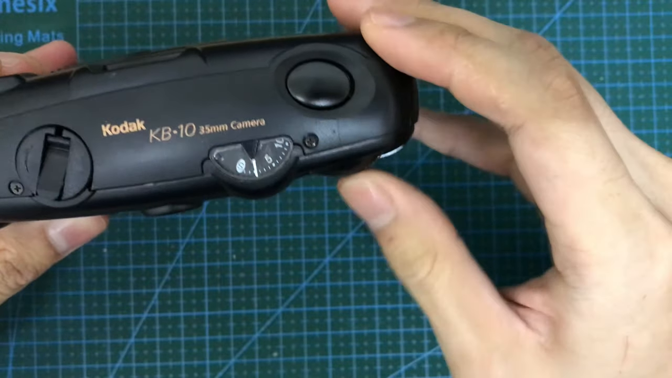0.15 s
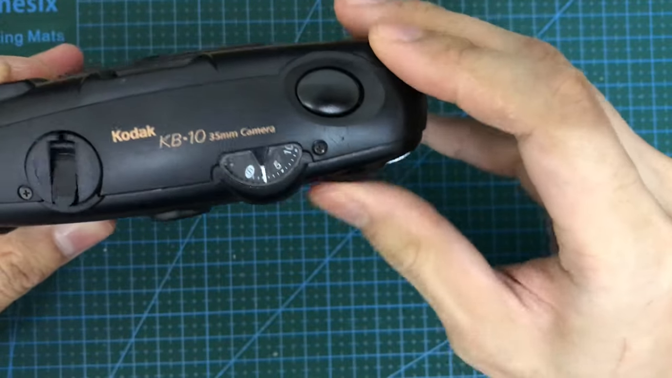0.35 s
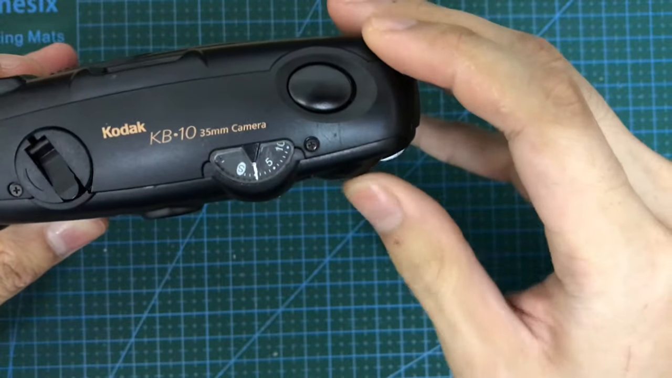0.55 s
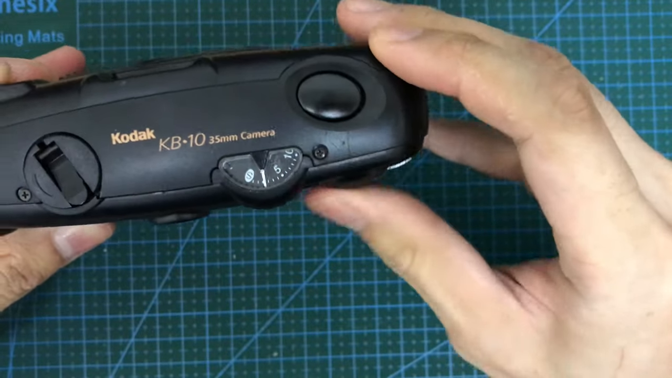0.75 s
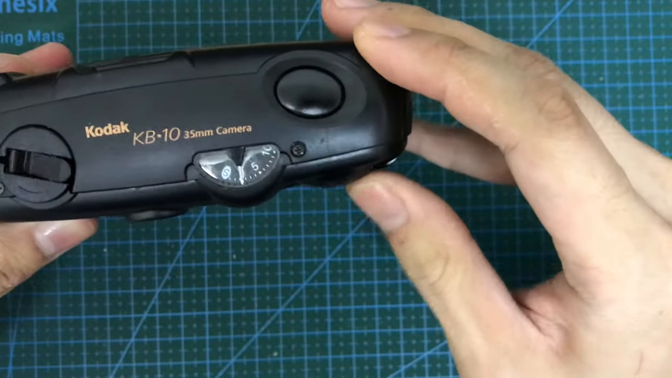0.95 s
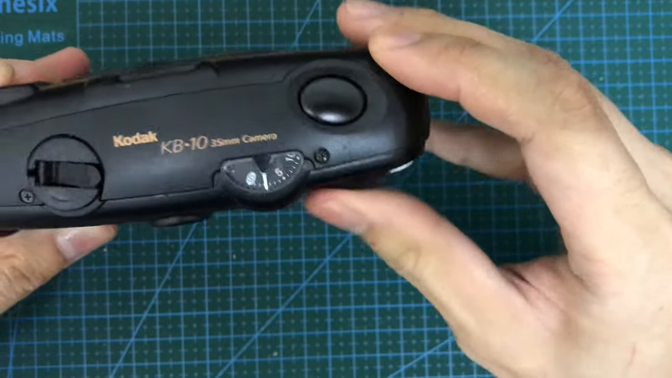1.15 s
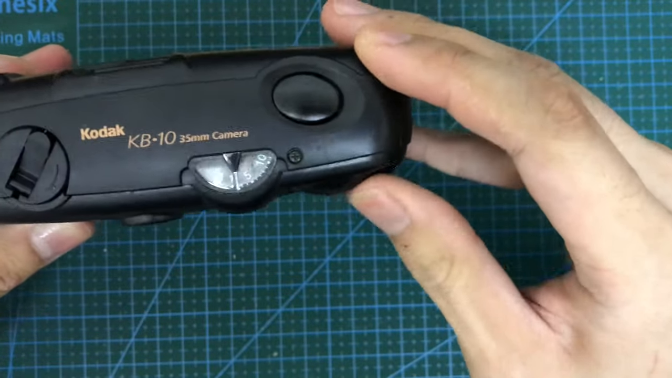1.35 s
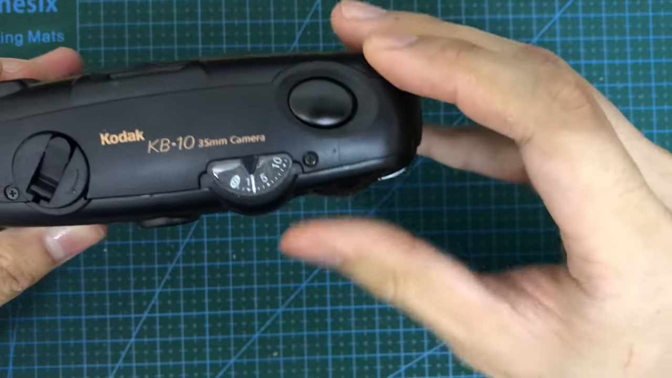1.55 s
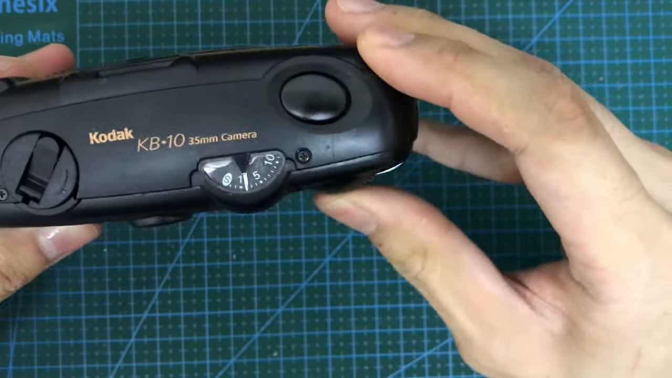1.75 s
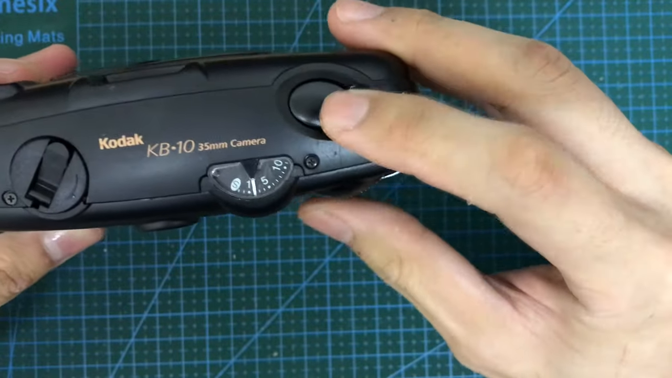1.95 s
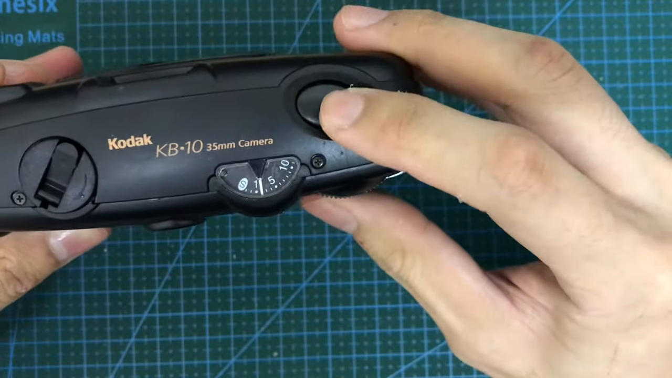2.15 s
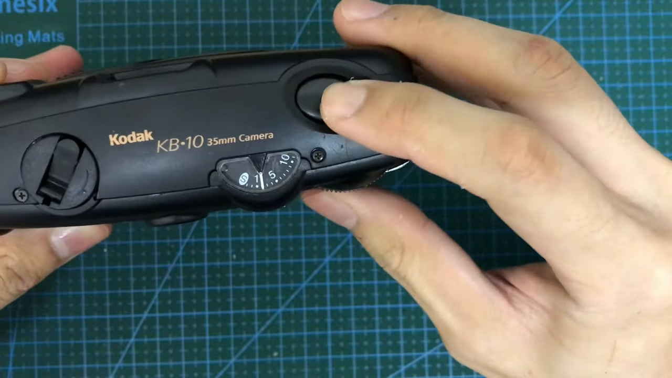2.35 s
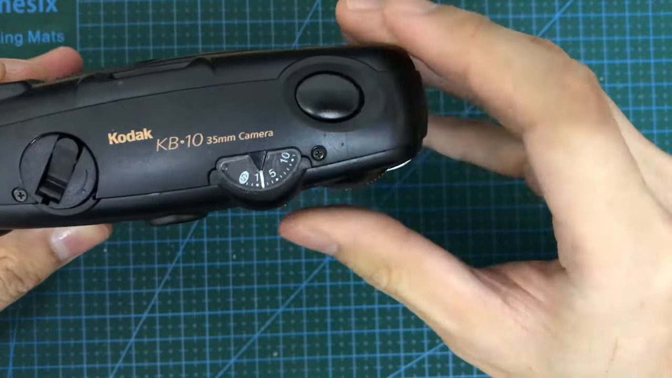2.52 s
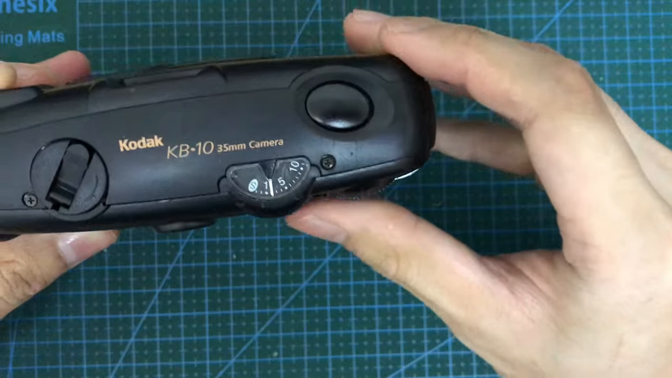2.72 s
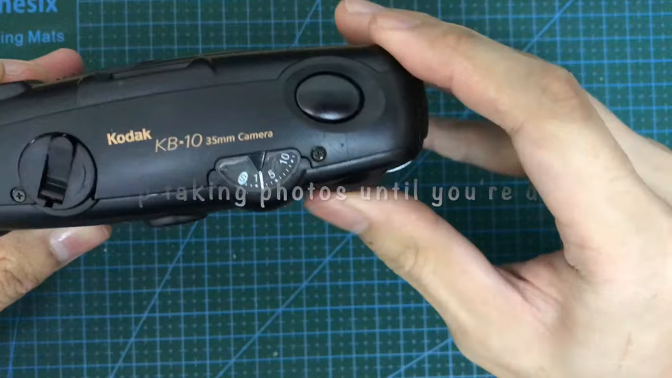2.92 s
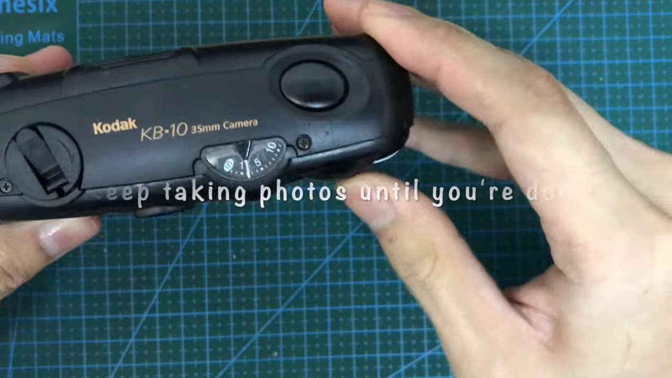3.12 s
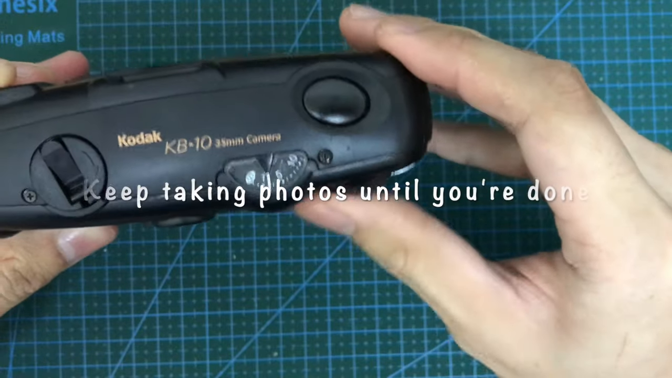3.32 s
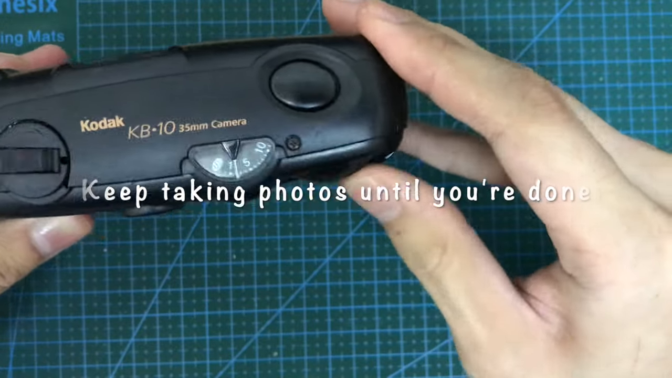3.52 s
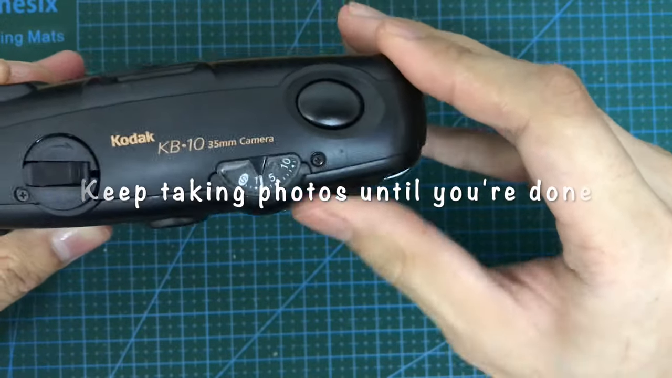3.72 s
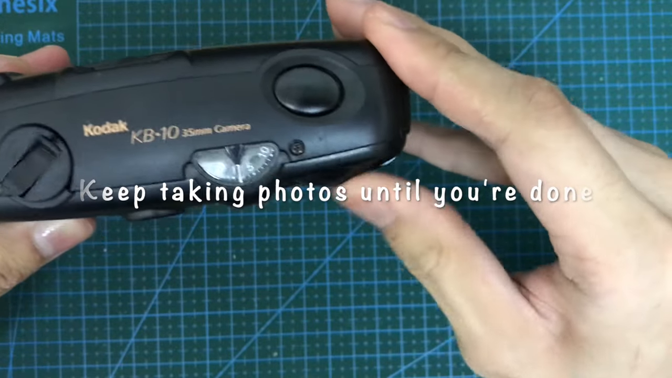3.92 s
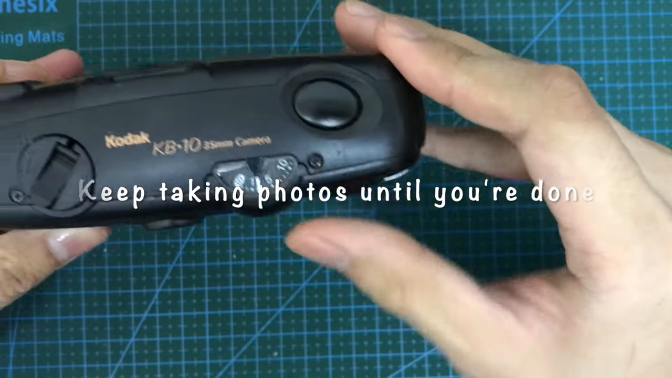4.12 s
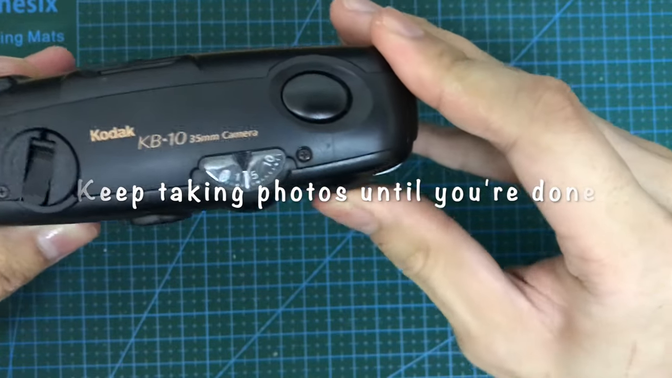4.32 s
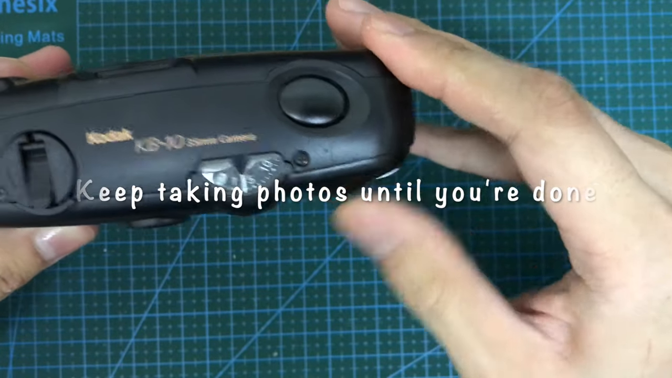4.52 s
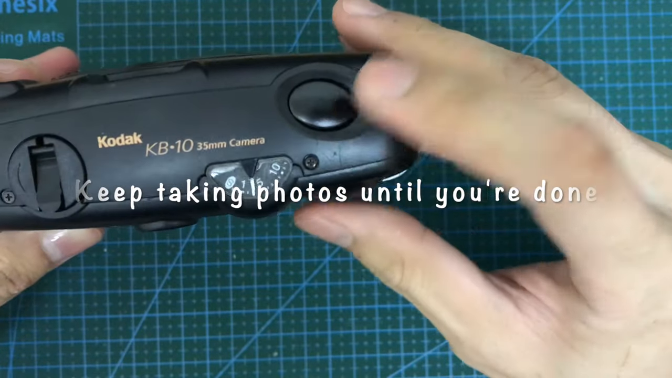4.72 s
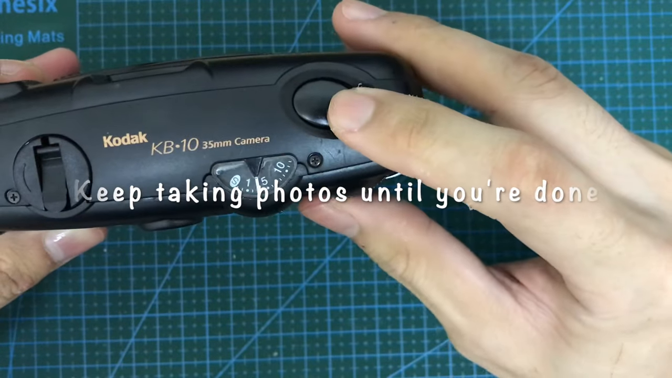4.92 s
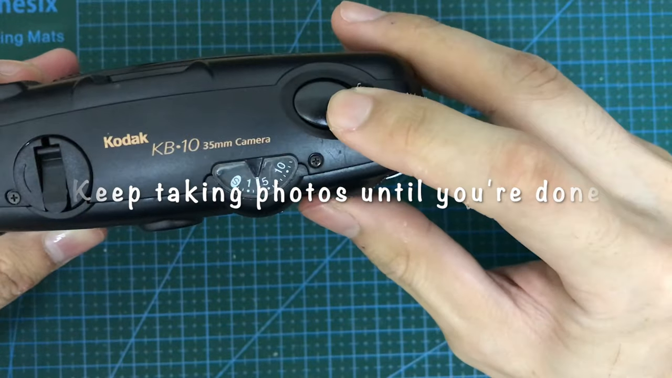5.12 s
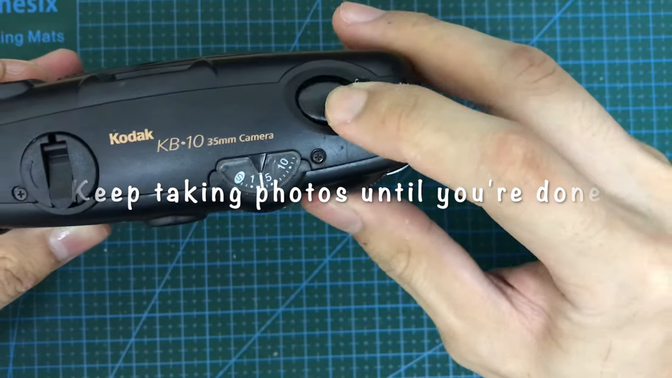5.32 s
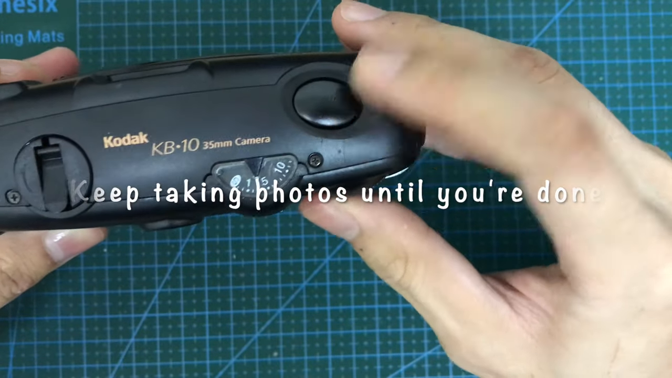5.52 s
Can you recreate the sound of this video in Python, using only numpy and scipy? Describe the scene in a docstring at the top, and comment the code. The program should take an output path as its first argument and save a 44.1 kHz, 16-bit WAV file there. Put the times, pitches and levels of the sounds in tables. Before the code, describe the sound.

Close microphone on a small hollow plastic camera at a desk. Rapid toothed clicks come in short zipping runs, slowing and speeding unevenly with the thumb. Firmer snaps mark the end of winding, faint button and case ticks follow, and a tight triple-blow shutter click is the loudest event. The sequence happens twice, with short room reflections and soft steady hum.

```python
"""A film camera's winding ratchet, close by: each thumb stroke clicks a pawl past a dozen or so teeth.
Four strokes precede each of two shots; latches snap as the winding ends, button and case tick lightly.
The shutter fires in three quick blows; a very faint whine climbs after the first shot.
Every blow is shaped noise ringing the plastic body, in a small room with a faint hum (filtered noise)."""
import sys
import numpy as np
from scipy import signal
from scipy.fft import rfft, irfft, next_fast_len
from scipy.io import wavfile
from scipy.ndimage import uniform_filter1d

SR = 44100
rng = np.random.default_rng(int(sys.argv[2]) if len(sys.argv) > 2 else 0)


def dump_mix(stems):
    """Bounce the given channels to the path in sys.argv[1] as a 16-bit WAV at rate SR."""
    frames = np.atleast_2d(stems).T  # one column per channel
    limited = np.clip(frames, -1, 1)  # hard clip at full scale
    pcm = np.round(limited * 32767).astype(np.int16)
    wavfile.write(sys.argv[1], SR, pcm)


N = 249606
BLOW_SAMPLES = 4096
BLOW_HZ = np.fft.rfftfreq(BLOW_SAMPLES, 1 / SR)


def amp(db):
    """Decibels to gain."""
    return 10 ** (np.asarray(db) / 20)


def read_curve(points, hz):
    """Joins (hz, value) points on a log-frequency axis."""
    point_hz, value = np.transpose(points)
    return np.interp(np.log(hz + 1), np.log(point_hz + 1), value)


def resonance_db(peaks, hz):
    """Sums the dB lifts of (hz, width_hz, lift_db) resonances."""
    return sum(lift_db / (1 + (2 * (hz - peak_hz) / width_hz) ** 2) for peak_hz, width_hz, lift_db in peaks)


def causal(db):
    """Minimum-phase response with this dB curve: it rings only after the blow."""
    mirrored_db = np.r_[db, db[-2:0:-1]]
    log_gain = np.log(amp(mirrored_db))
    return np.exp(np.conj(signal.hilbert(log_gain)))[:len(db)]


def add(mix, start_s, sound):
    """Mixes a sound in at start_s, cut at the end of the mix."""
    part = mix[max(round(start_s * SR), 0):][:len(sound)]
    part += sound[:len(part)]


def chatter(grain, rise_s, hold_s, fade_s, even):
    """Spectrum of a few milliseconds of tiny contacts as a part lands and settles."""
    t = np.arange(BLOW_SAMPLES) / SR
    attack = np.minimum(t / rise_s, 1)
    decay = np.exp(-np.maximum(t - hold_s, 0) / fade_s)
    spectrum = rfft(attack * decay * grain)
    power = uniform_filter1d(abs(spectrum) ** 2, size=15)
    # sharp contacts leave few holes in the spectrum: even = 0 as drawn, 1 flattened
    return spectrum * causal(-10 * even * np.log10(power + 1e-9))


# camera body resonances: hz, width_hz, lift_db
BODY = [(632, 81, 13), (824, 44, 10), (1331, 190, 13), (1735, 730, 6), (2287, 77, 5.5), (3150, 250, 6.5),
        (3820, 220, 3.5), (4230, 260, 8), (5450, 280, 6), (6400, 290, 4.5), (6860, 240, 7),
        (8350, 610, 5.5), (9470, 600, 5.5), (10560, 230, 3), (11450, 280, 5), (12350, 520, 10.5),
        (14800, 650, 13.5), (15200, 250, 3)]
# each new hold of the hand frees one shell panel to ring: start_s, panel_hz, lift_db
HOLDS = [(0, 1700, 4.5), (0.7, 4380, 3.5), (1.15, 5070, 0), (1.6, 2450, 12), (2.8, 2600, 5.5),
         (3.3, 2170, 2), (3.7, 2000, 1.5), (4.2, 2600, 2), (4.8, 2350, 5)]


def blow(contact, force, start_s, slack, level_db, thud_db, knock_db, ring_db, tilt, wheel_hz=3150):
    """One contact rings the body; the grip sets how much shell and wheel answer."""
    lag_s, detune = 0.000805, 0.019  # bending delay at 2 kHz; relative shift per unit of slack
    hold = max(np.searchsorted(np.transpose(HOLDS)[0], start_s) - 1, 0)
    _, panel_hz, panel_db = HOLDS[hold]
    grip = [(780, 350, thud_db), (1350, 380, knock_db), (wheel_hz, 460, ring_db),
            (panel_hz, 0.13 * panel_hz, panel_db)]
    # play in the gears detunes each blow a little
    body_db = resonance_db(BODY + grip, BLOW_HZ * (1 + detune * slack))
    tilt_db = tilt * read_curve([(3500, -0.33), (8000, 0.33)], BLOW_HZ)
    # low bending waves cross the shell more slowly
    bending = np.exp(-4j * np.pi * lag_s * np.sqrt(2000 * BLOW_HZ))
    response = causal(read_curve(force, BLOW_HZ) + body_db + tilt_db)
    sound = irfft(contact * bending * response)
    over_5_ms = np.sqrt(SR / 200 / np.sum(sound ** 2))
    return amp(level_db) * sound * over_5_ms


def strikes(rows, force, gain_db, rise_s, hold_s, fade_s, lead_s, alike=0.0, even=0.17):
    """Plays a table of blows; each grain keeps a share (alike) of the last, so colour drifts."""
    out = np.zeros(N)
    grain = rng.standard_normal(BLOW_SAMPLES)
    for start_s, *colour in rows:
        fresh = rng.standard_normal(BLOW_SAMPLES)
        grain = alike * grain + np.sqrt(1 - alike ** 2) * fresh
        contact = chatter(grain, rise_s, hold_s, fade_s, even)
        slack = rng.standard_normal()
        add(out, start_s - lead_s, blow(contact, force, start_s, slack, *colour))
    return amp(gain_db) * out


def tooth_times(speed):
    """The pawl drops at the stroke's start, then each time the wheel turns by one tooth."""
    point_s, teeth_per_s = np.transpose(speed)
    t = np.arange(point_s[0], point_s[-1], 1 / SR)
    turned = np.cumsum(np.interp(t, point_s, teeth_per_s)) / SR
    return np.interp(np.arange(int(turned[-1]) + 1), turned, t)


# wheel speed under the thumb, one curve per stroke: time_s, teeth_per_s
SPEEDS = [
    [(0.0047, 75.6), (0.0755, 40.6), (0.1372, 113.0), (0.1523, 68.4)],
    [(0.373, 67.6), (0.3995, 101.6), (0.4431, 56.0), (0.4943, 76.7), (0.5732, 25.0)],
    [(0.8278, 102.6), (0.8807, 98.6), (0.9072, 73.8), (0.9774, 87.8)],
    [(1.2029, 68.4), (1.2518, 119.5), (1.2755, 91.5), (1.3092, 148.4), (1.3431, 97.7)],
    [(2.9313, 37.9), (3.0136, 50.6), (3.0367, 72.8), (3.0812, 65.0), (3.0926, 102.2), (3.1542, 27.9)],
    [(3.4091, 112.9), (3.4912, 89.5), (3.5506, 129.2), (3.5786, 36.5)],
    [(3.8319, 93.8), (3.9268, 59.2), (3.9876, 143.7)],
    [(4.2943, 110.2), (4.3679, 25.0), (4.4083, 87.4)],
]
# grip per stroke, pairs glide start to end; levels before gain_db; tilt [0.33 dB each way per unit]:
# level_db, end_level_db, knock_db, end_knock_db, ring_db, end_ring_db, thud_db, tilt
STROKES = [(-33, -32.5, 2.5, -3, 8, -7, 0.5, 2), (-33, -31, -6.5, 1.5, -8, 7.5, -3, -1),
           (-30.6, -31.5, 6, -5, 8, 10, -1.5, 3), (-31.5, -33, 4, -11, 11.5, -15, 1.5, 2.5),
           (-30, -33.5, 3.5, 3, 13, -3.5, 5, 2.5), (-31, -34, -0.5, -1.5, -9, 4, -1, -2),
           (-30.5, -36.5, -2.5, -2.5, 5.5, 4, 1, 1), (-32.1, -32.9, 2.5, 8, -2.5, -3, -2.5, 1)]
# wheel ring, one value per stroke: ring_hz
WHEEL_HZ = [3150, 3200, 3150, 3170, 3310, 3200, 3130, 3150]
# tooth-to-tooth standard deviations: level_db, thud_db, knock_db, ring_db, tilt [as above]
TOOTH_SCATTER = (0.45, 1.6, 3.0, 2.5, 2.2)


def teeth():
    """One blow per tooth; strength and colour glide as the thumb rolls over the wheel."""
    rows = []
    for speed, stroke, wheel_hz in zip(SPEEDS, STROKES, WHEEL_HZ):
        level_db, end_level_db, knock_db, end_knock_db, ring_db, end_ring_db, thud_db, tilt = stroke
        times_s = tooth_times(speed)
        first = (level_db, thud_db, knock_db, ring_db, tilt)
        last = (end_level_db, thud_db, end_knock_db, end_ring_db, tilt)
        grip = np.linspace(first, last, len(times_s))
        grip = grip + np.array(TOOTH_SCATTER) * rng.standard_normal(grip.shape)
        rows += [(start_s, *colour, wheel_hz) for start_s, colour in zip(times_s, grip)]
    return rows


def spring(drops):
    """The pawl's small steel spring, shaken by the drops, sings on faintly after each stroke."""
    ring_hz, t60_s, ring_db = 3195, 0.5, -73
    t = np.arange(SR) / SR
    ring = amp(ring_db - 60 * t / t60_s) * np.sin(2 * np.pi * ring_hz * t)
    return signal.fftconvolve(drops, ring)[:N]


# force spectrum of a pawl drop or light tick: hz, force_db
PAWL_FORCE = [(100, -42.5), (450, -28), (700, -8.5), (1000, -8), (1600, -6), (3000, 3.5), (4500, -1),
              (6000, -6), (7600, -7.5), (9500, -6.5), (11000, -8), (15500, -15)]
# force spectrum of a soft pawl onset or a latch: hz, force_db
LATCH_FORCE = [(100, -11), (450, -15.5), (700, -8.5), (1000, -9), (1600, -7.5), (3000, 0.5), (4500, -3.5),
               (7500, -3.5), (10000, -5), (15500, -15.5)]


def ratchet():
    """Each pawl drop has a short soft onset and shakes its spring."""
    rows = teeth()
    onsets = strikes(rows, LATCH_FORCE, gain_db=-9, rise_s=0.0015, hold_s=0.00091, fade_s=0.00038,
                     lead_s=0.0016)
    drops = strikes(rows, PAWL_FORCE, gain_db=-0.47, rise_s=0.00091, hold_s=0.002, fade_s=0.0026,
                    lead_s=0.0009, alike=0.62, even=0.23)
    return onsets + drops + spring(drops)


# room decay: hz, t60_s
ROOM_T60 = [(400, .35), (1300, 0.19), (3300, 0.3), (7000, 0.31), (11000, 0.28), (16000, 0.21)]
# room strength: hz, gain_db
ROOM_GAIN = [(400, -7.5), (1300, -5), (3300, -11), (7000, -12), (15000, -12)]


def room(dry_sound):
    """Dense reflections from desk and walls: noise decaying at its own rate in each band."""
    delay_s, build_s = 0.003, 0.0014
    hz, t, bands = signal.stft(rng.standard_normal(SR), SR, nperseg=256)
    t60_s = read_curve(ROOM_T60, hz)[:, None]
    gain_db = read_curve(ROOM_GAIN, hz)[:, None]
    unit_energy = np.sqrt(2 * np.log(1000) / (t60_s * SR))
    bands = bands * amp(gain_db - 60 * t / t60_s) * unit_energy
    tail = signal.istft(bands, SR, nperseg=256)[1][:SR]
    tail *= np.clip((np.arange(SR) / SR - delay_s) / build_s, 0, 1)
    return signal.fftconvolve(dry_sound, tail)[:N]


# room air, relative density: hz, density_db
AIR = [(20, -47), (36, -40.5), (48, -15.5), (62, -16), (72, -19), (100, -15), (200, -15), (330, -18.5),
       (450, -25), (700, -21), (1200, -27.5), (1800, -35), (2800, -41), (5000, -52.5), (8000, -60),
       (16000, -58)]
# narrow bands of the hum: hz, width_hz, lift_db
HUM = [(87, 10, 9), (114, 11, 15), (176, 14, 9), (196, 16, 8), (273, 15, 13), (306, 12, 5), (610, 18, 13),
       (660, 25, 5), (6850, 500, 6)]


def hum(level_db=-48.0):
    """Narrow noise bands waver as a machine hum over the soft air of the room."""
    size = next_fast_len(N)
    hz = np.fft.rfftfreq(size, 1 / SR)
    colour = amp(read_curve(AIR, hz) + resonance_db(HUM, hz))
    noise = irfft(rfft(rng.standard_normal(size)) * colour, size)[:N]
    rms = np.sqrt(np.mean(noise ** 2) + 1e-20)
    return amp(level_db) * noise / rms


# light ticks of button and case, and one doubled first tooth click at 3.826 s:
# start_s, level_db [before gain_db], knock_db, tilt [0.33 dB each way per unit]
TICKS = [(0.8173, -47, 11, 0), (1.656, -45, 5, -27.5), (1.8727, -53, 0, 1), (2.065, -46.5, 4, -12),
         (2.2392, -53, -1, 10.5), (2.597, -51.5, -4, 3), (3.8264, -35, -3, 0), (4.6916, -48, 8, -10),
         (4.9862, -46.5, 8.5, -15), (5.0539, -56, 9, -20), (5.1728, -52, 4.5, -26.5), (5.327, -51, 0, 23),
         (5.496, -37.5, 12.5, -23)]


def ticks():
    """Light ticks of button and case, and one doubled first tooth click at 3.826 s."""
    thud_db, ring_db = 3, -3
    rows = [(start_s, level_db, thud_db, knock_db, ring_db, tilt)
            for start_s, level_db, knock_db, tilt in TICKS]
    return strikes(rows, PAWL_FORCE, gain_db=-6.0, rise_s=0.0004, hold_s=0.00085, fade_s=0.0033,
                   lead_s=0.00085, even=0.3)


# cocking lever and end stop catch; level before gain_db; tilt [0.33 dB each way per unit]:
# start_s, level_db, thud_db, knock_db, ring_db, tilt
LATCHES = [(1.2675, -23, 0.5, -3, -0.5, 8.5), (1.3512, -22.5, 2, 3, 2.5, -1.5),
           (1.357, -33, 3.5, 2, 4.5, -9), (3.9774, -28, 3, 6, -3, -11), (3.9931, -23, -11, -9, 2, 3.5),
           (4.0055, -36, -5, -5, -3, 5), (4.4152, -23, 2, -3, -5.5, -0.5), (4.4235, -33, 2, -8, 7, -7),
           (4.44, -32.5, -5, -6, -4, -6)]


def latches():
    """Hard blows as the cocking lever and the end stop catch."""
    return strikes(LATCHES, LATCH_FORCE, gain_db=1.0, rise_s=0.0004, hold_s=0.0019, fade_s=0.0047,
                   lead_s=0.0004)


# shots, level before gain_db: strike_s, level_db, knock_db, tilt [0.33 dB each way per unit]
SHOTS = [(2.2603, -16, -3.5, -1), (5.3476, -16.5, 3, 2)]
# release, blade strike, blade return; level and tilt add to the shot's:
# after_strike_s, level_db, thud_db, tilt [0.33 dB each way per unit]
SHUTTER_CYCLE = [(-0.0057, -14, 4, 2.5), (0, 1, -1, -1), (0.0085, -5.5, 0, -2)]


def shutter_blows():
    """Every shot runs through the same three blows."""
    rows = []
    for strike_s, shot_db, knock_db, shot_tilt in SHOTS:
        for after_s, blow_db, thud_db, blow_tilt in SHUTTER_CYCLE:
            rows.append((strike_s + after_s, shot_db + blow_db, thud_db, knock_db, 0, shot_tilt + blow_tilt))
    return rows


# force spectrum of a shutter blow: hz, force_db
SHUTTER_FORCE = [(100, -42), (450, -28.5), (700, -9.5), (1000, -2.5), (1400, -2.5), (2000, -3.5),
                 (3100, 5.5), (5000, 3), (7500, 5.5), (9500, 3), (11000, 2.5), (15500, 2)]


def shutter():
    """Spring-driven release, blade strike and blade return."""
    return strikes(shutter_blows(), SHUTTER_FORCE, gain_db=0.07, rise_s=0.0007, hold_s=0.0016,
                   fade_s=0.0038, lead_s=0.0007)


def snaps():
    """Latches and shutter as they leave one side of the camera; grains drawn anew each call."""
    return latches() + shutter()


def snap_echoes(count=3):
    """Each side of the camera sends its own colour to the walls, so the tail is smooth."""
    return sum(room(snaps()) for _ in range(count)) / np.sqrt(count)


def charger():
    """A thin tone, like a flash charging, nears its top pitch exponentially as the capacitor fills."""
    start_s, end_s, fade_s, charge_s = 2.38, 3.78, 0.08, 1.6
    start_hz, top_hz = 7600, 21700
    start_db, rise_db_per_s = -84.5, 5.0  # rms, before the fades
    t = np.maximum(np.arange(N) / SR - start_s, 0)
    hz = top_hz - (top_hz - start_hz) * np.exp(-t / charge_s)
    gate = np.clip(np.minimum(t, end_s - start_s - t) / fade_s, 0, 1)
    tone = np.sqrt(2) * np.sin(2 * np.pi * np.cumsum(hz) / SR)
    return gate * amp(start_db + rise_db_per_s * t) * tone


def scene():
    """Ratchet, ticks, latches, shutter and charger in the humming room."""
    winding = ratchet() + ticks()
    mix = winding + room(winding) + snaps() + snap_echoes() + charger() + hum()
    return mix[None]


def record(dry):
    """The recorder's band limit: a linear-phase low-pass."""
    edge_hz = 15950
    lowpass = signal.firwin(255, edge_hz, window=("kaiser", 8), fs=SR)
    return signal.oaconvolve(dry, lowpass[None], "same")


dry = scene()
out = record(dry)
dump_mix(out)
```